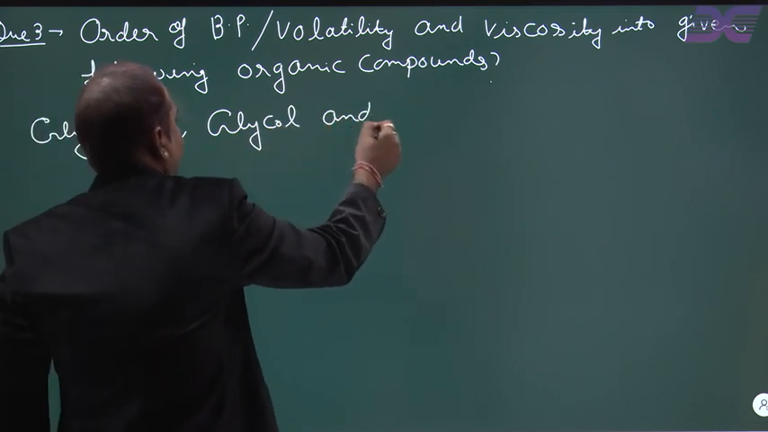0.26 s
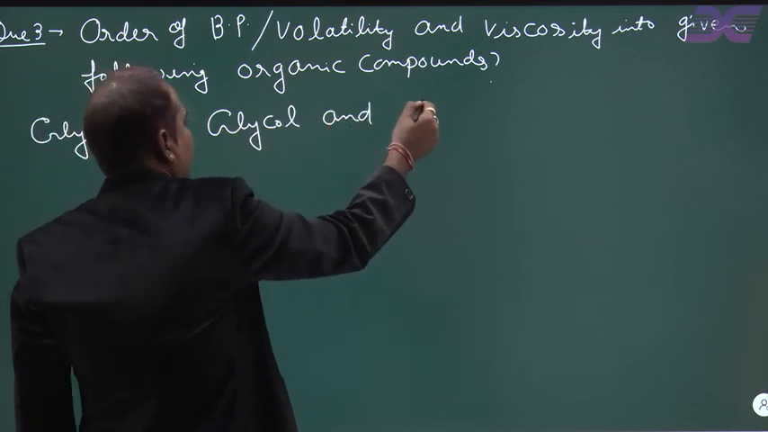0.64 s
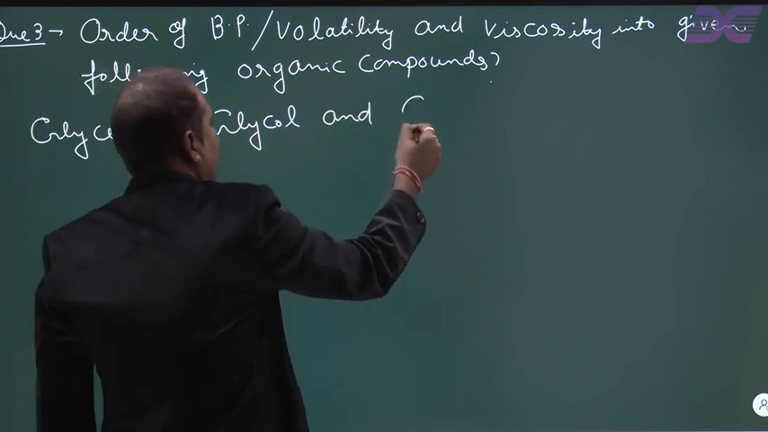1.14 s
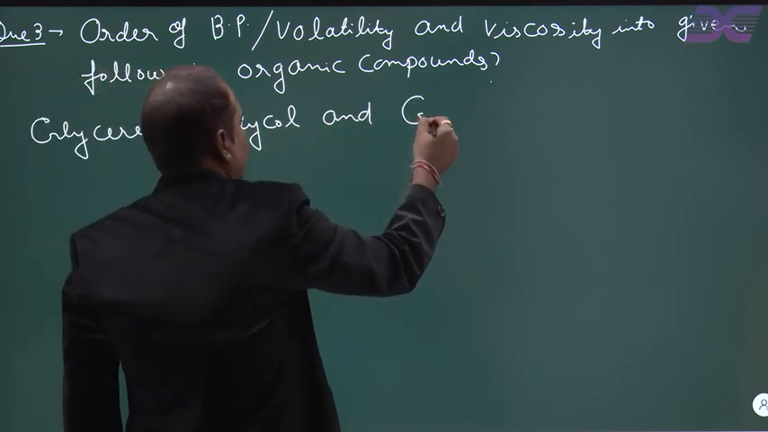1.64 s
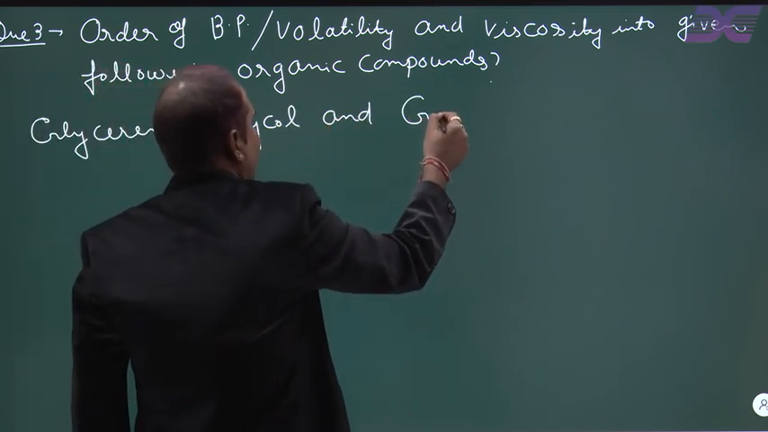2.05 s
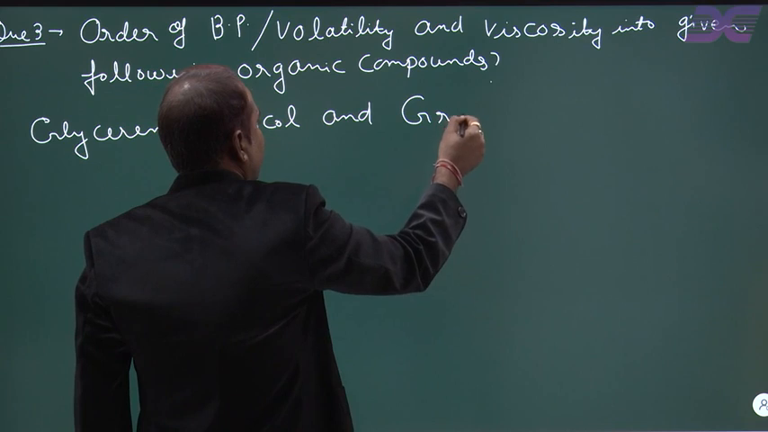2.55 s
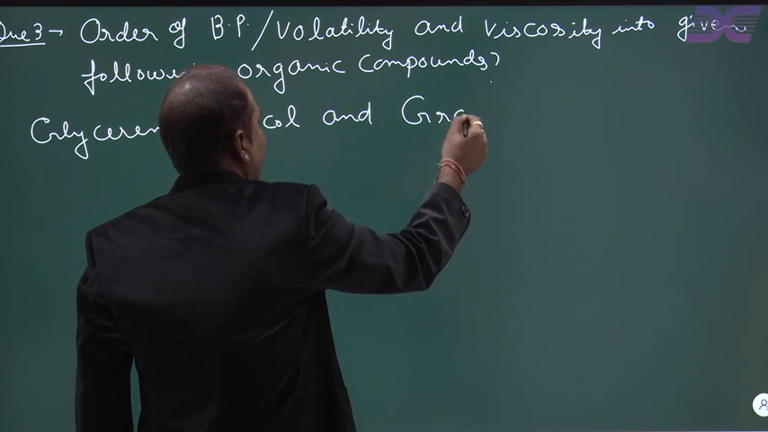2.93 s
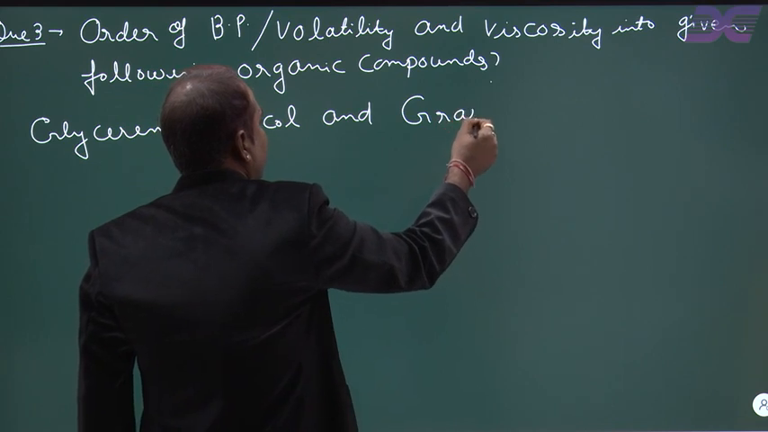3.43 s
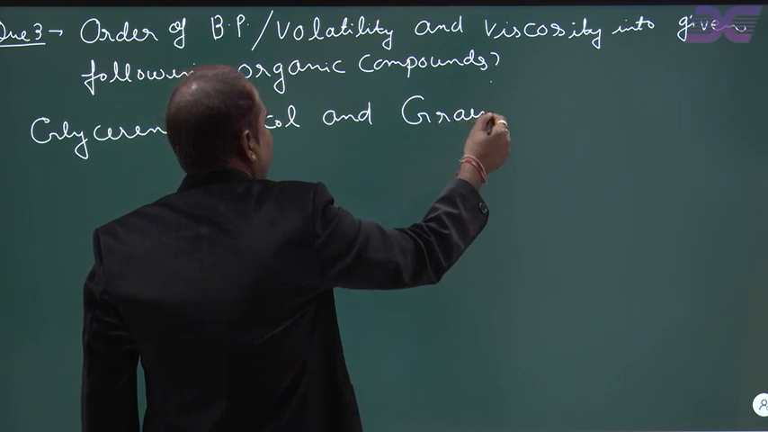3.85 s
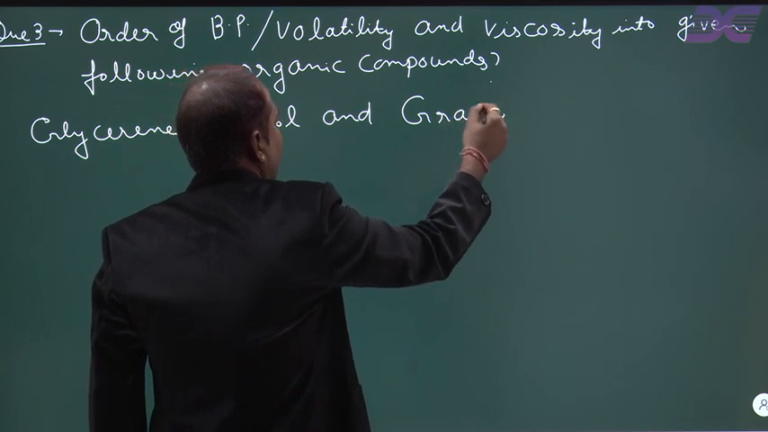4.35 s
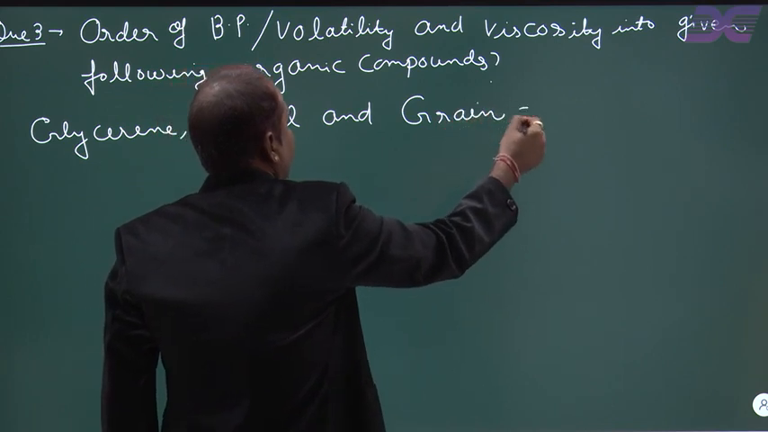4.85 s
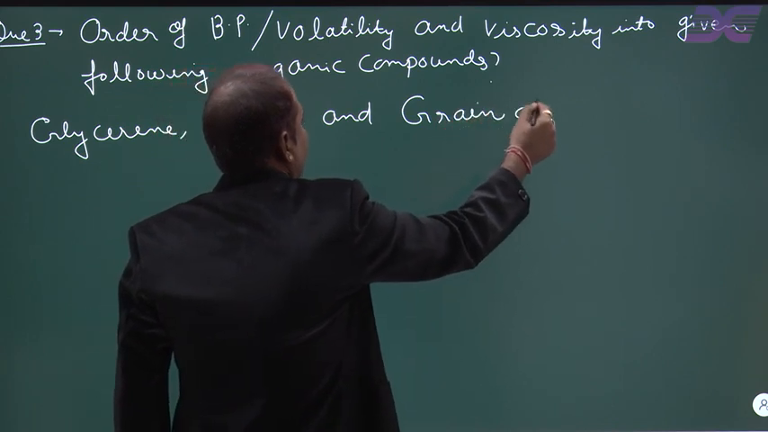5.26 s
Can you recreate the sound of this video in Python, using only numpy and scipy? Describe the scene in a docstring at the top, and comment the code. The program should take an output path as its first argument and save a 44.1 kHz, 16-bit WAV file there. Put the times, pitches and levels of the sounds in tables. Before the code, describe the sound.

Chalk taps and softly scratches across a blackboard in a quiet room, with light jacket rustle over a low hum.

```python
"""Chalk on a blackboard

Someone writes on a wall blackboard in a quiet classroom, heard through a clip-on microphone.
The chalk lands with a click that sets the board ringing, then hisses along each curve of the letters.
A jacket rustles and bumps near the microphone; under it all lie room rumble and a faint mains hum."""
import sys
import numpy as np
from scipy import signal
from scipy.fft import rfft, irfft, next_fast_len
from scipy.io import wavfile
from scipy.ndimage import uniform_filter1d, map_coordinates

SR = 44100
rng = np.random.default_rng(int(sys.argv[2]) if len(sys.argv) > 2 else 0)


def wav_record(signal):
    """Record a signal, one row per channel, as 16-bit PCM in the file named by sys.argv[1]."""
    frames = np.transpose(np.atleast_2d(signal))
    bounded = np.clip(frames, -1, 1)
    # unit amplitude maps onto the largest positive 16-bit level
    quanta = np.round(bounded * 32767).astype(np.int16)
    wavfile.write(sys.argv[1], SR, quanta)


N = 242197

# One chalk stroke per curve of a letter. Each row: time of top speed, time speeding up and time
# slowing down in seconds, then the levels of the stick's ring and its sharp edge's hiss in dB.
STROKES = [ (.047, 0.079, 0.057, -49, -58), (.165, 0.092, 0.11, -54.5, -57.5),
           (.80, 0.12, 0.29, -61.5, -66.5), (1.03, 0.22, 0.15, -64, -66), (1.17, 0.16, 0.16, -61, -61.5),
           (1.35, 0.15, 0.076, -67, -67.5), (1.50, 0.11, 0.099, -66.5, -61.5),
           (1.70, 0.17, 0.097, -62, -64.5), (1.99, .08, 0.19, -63, -62), (2.11, 0.094, 0.078, -70, -65.5),
           (2.225, 0.13, .11, -65, -59.5), (2.38, 0.1, 0.074, -65.5, -65), (2.73, 0.12, .11, -63, -63),
           (2.86, 0.16, 0.13, -63, -58), (3.12, 0.098, .09, -67, -65.5), (3.19, .08, 0.075, -66, -59.5),
           (3.27, 0.098, 0.083, -67, -73), (3.50, 0.24, 0.16, -64.5, -62), (3.69, 0.069, 0.095, -65, -65.5),
           (3.805, .06, 0.1, -63, -65), (3.99, 0.096, .1, -64.5, -63), (4.095, 0.094, 0.07, -59.5, -61.5),
           (4.76, 0.06, 0.054, -58.5, -60), (4.835, .07, 0.15, -61, -60.5), (5.04, 0.081, 0.17, -63, -58.5),
           (5.18, .13, 0.074, -57, -66), (5.27, 0.075, .1, -60.5, -62), (5.38, 0.11, 0.039, -60.5, -59)]


def amp(db):
    """Turn decibels (dB) into a number to multiply a sound by."""
    return 10 ** (np.asarray(db) / 20)


def unit(x):
    """Scale a signal to an average strength (root mean square) of 1."""
    return x / np.sqrt(np.mean(x ** 2) + 1e-20)


def along(points, hz):
    """Read between rows of frequency and value, spacing the octaves evenly."""
    freqs, values = np.transpose(points)
    return np.interp(np.log(hz + 1), np.log(freqs + 1), values)


def wobble(rate):
    """A smooth curve through `rate` random values a second."""
    return map_coordinates(rng.standard_normal(int(N * rate / SR) + 4), [np.arange(N) * rate / SR])


def coloured(x, tone):
    """Filter x to strength 1 by a tone table, whose levels say how strong each frequency is."""
    size = next_fast_len(len(x) + 8192)
    hz = np.fft.rfftfreq(size, 1 / SR)
    low_cut = 1 / (1 + (tone[0][0] / (hz + 1)) ** 8)
    high_cut = 1 / (1 + (hz / tone[-1][0]) ** 16)
    shaped = rfft(x, size) * amp(along(tone, hz)) * low_cut * high_cut
    return unit(irfft(shaped, size)[:len(x)])


def noise(tone, size):
    """Fresh noise with the given tone, at strength 1."""
    return coloured(rng.standard_normal(size), tone)


def burst(tone, shape):
    """Noise that follows a loudness shape and has the same energy as that shape."""
    return unit(noise(tone, len(shape)) * shape) * np.sqrt(np.mean(shape ** 2))


def fade(t, ring_s):
    """Die away smoothly, dropping 60 dB in ring_s seconds."""
    return np.exp(-np.log(1000) * t / ring_s)


def ringing(notes, t, scatter_db):
    """A struck object's own notes fade away, with new random strengths at each hit."""
    hz, db, ring_s = np.transpose(notes)[:, :, None]
    gain = amp(db + scatter_db * rng.standard_normal(db.shape)) * rng.choice([-1, 1], db.shape)
    waves = gain * np.sin(2 * np.pi * hz * t) * fade(t, ring_s)
    return waves.sum(axis=0) / np.sqrt(np.sum(gain ** 2) / 2)


def grains(rate, spread_db):
    """Tiny impacts of random size, about `rate` a second."""
    hit = rng.random(N) < rate / SR
    return unit(hit * rng.standard_normal(N) * amp(spread_db * rng.standard_normal(N)))


def add(track, start, sound):
    """Mix a sound into the track at `start` seconds."""
    part = track[max(round(start * SR), 0):][:len(sound)]
    part += sound[:len(part)]


def speed(fastest, rise_s, fall_s):
    """The hand speeds up from rest and slows again: a curve from 0 to 1 and back."""
    progress = np.interp(np.arange(N) / SR - fastest, [-rise_s, 0, fall_s], [0, 1, 0])
    return np.sin(np.pi / 2 * progress) ** 2


def loudness(speeds, db, power):
    """Combined loudness of several movements, each reaching its level at full speed."""
    return np.linalg.norm(amp(db)[:, None] * speeds ** power, axis=0)


def room():
    """Steady room noise, a swelling deep rumble and the hum of mains electricity."""
    # The room's tone. Each row: frequency in Hz, level in dB.
    room_tone = [(12, -6), (20, 0), (83, -3.5), (158, -4.5), (443, -15.5), (524, -16.5), (891, -20.5),
                 (1110, -23), (1790, -30), (2960, -34.5), (3220, -33.5), (4250, -35.5), (4630, -35),
                 (6840, -34), (15800, -38.5)]
    rumble = amp(-69.5 + 6.1 * wobble(7)) * noise([(25, -1), (40, 11), (70, -25)], N)
    hum = np.sqrt(2) * np.sin(2 * np.pi * 100 * np.arange(N) / SR + 0.47 * wobble(3.49))
    return amp(-51) * noise(room_tone, N) + amp(-58) * hum + rumble


def drifting(x, depth_db):
    """Narrow bands of pitch come and go as the chalk's contact point travels."""
    bands = signal.stft(x, nperseg=1024)[2]

    def patches(width):
        across_pitch = uniform_filter1d(rng.standard_normal(bands.shape), width, axis=0)
        return unit(uniform_filter1d(across_pitch, size=8, axis=1))  # smooth over time too

    drift = unit(patches(width=3) + patches(width=12))  # thin peaks on broad humps
    return signal.istft(bands * amp(depth_db * drift), nperseg=1024)[1][:N]


def chalk_strokes(speeds):
    """Chalk crumbles in thousands of tiny slips, louder and brighter the faster it moves."""
    # Three tones. Each row: frequency in Hz, level in dB.
    rasp_tone = [(2300, -1.5), (2600, 3.5), (3200, -8.5), (3900, -3), (4700, 1), (5600, -4), (7000, -9)]  # chalk on the board
    stick_tone = [(5600, -13), (6100, -5), (6550, 1), (6850, -3), (7250, -8), (7750, -1), (8000, -2),
                  (8350, 1), (8900, -5), (9500, -16)]  # the gripped stick ringing
    edge_tone = [(9300, -11), (10100, -1), (10600, 0), (11400, -1), (12300, -10), (13200, -11), (14200, -7),
                 (15100, -12), (16500, -13)]  # its sharp edge ringing
    *_, stick_db, edge_db = np.transpose(STROKES)
    rasp_db = -69 + 0.42 * (stick_db - stick_db.mean())  # louder strokes also rasp more
    slips = drifting(grains(rate=7000, spread_db=1.5), depth_db=3.2)
    grip_db = 0.97 * wobble(70)  # the tip catches and frees
    rasp = loudness(speeds, rasp_db, power=0.51) * coloured(slips, rasp_tone)
    stick = loudness(speeds, stick_db, power=0.93) * coloured(slips, stick_tone)
    edge = loudness(speeds, edge_db, power=1.2) * coloured(slips, edge_tone)
    return amp(grip_db) * (rasp + stick + edge)


def jacket(speeds):
    """The moving arm rubs the cloth, which once brushes the microphone with a crackle."""
    # Wide arm swings. Each row: time of top speed and half the length in seconds, level in dB.
    swings = [(0.03, .13, -43), (0.181, 0.042, -46.5), (.4, .2, -48), (.615, 0.076, -54), (1, .09, -45.5),
              (1.12, 0.15, -49), (3.86, .25, -53), (5.147, 0.15, -54)]
    # The brush against the microphone. Each row: time in seconds, level in dB.
    brush = [(0.32, -63.5), (0.386, -58.5), (0.426, -45.5), (0.466, -52), (0.472, -47.5), (0.54, -74)]
    # Two tones. Each row: frequency in Hz, level in dB.
    rub_tone = [(29, -22), (50, -22), (70, -5), (97, -3), (183, 2.5), (386, -11), (470, -8), (829, -26.5),
                (890, -18), (3500, -39.5), (4550, -70), (7700, -120)]  # the sleeve rubbing
    crackle_tone = [(500, 18.5), (1000, -1), (1800, 2.5), (2600, 5), (4000, -1.5), (6500, 2), (8500, 0),
                    (11000, -6), (16000, -7)]  # cloth on the microphone
    swing_speeds = np.array([speed(fastest, half, half) for fastest, half, _ in swings])
    swinging = loudness(swing_speeds, [db for *_, db in swings], power=0.65)
    writing = amp(-58.5) * speeds.max(axis=0)
    rub = np.hypot(swinging, writing) * noise(rub_tone, N)
    brush_db = np.interp(np.arange(N) / SR, *np.transpose(brush), left=-120, right=-120)
    fibres = grains(rate=4000, spread_db=3.5)
    return rub + amp(brush_db) * coloured(fibres, crackle_tone)


def ticks_and_bumps():
    """Small ticks and bumps, two of them from the chalk bouncing on the board."""
    # Tiny dry ticks, and a sharp click as the chalk bounces after its hardest landing.
    # Each row: start in seconds, level in dB.
    ticks = [(0.411, -40), (0.4316, -42), (0.4713, -35), (0.4968, -37.5), (4.296, -22), (4.389, -36.5),
             (4.3925, -43)]
    # Soft body bumps, and a light knock as the chalk rebounds on the board.
    # Each row: start in seconds, low thump level in dB, knock level in dB.
    bumps = [(.18, -40, -60), (0.332, -41, -63), (0.422, -33.5, -45), (.477, -35.5, -52), (.494, -44, -64),
             (.746, -38, -40), (0.8166, -23.5, -36), (.853, -34, -42), (1.023, -43, -45), (1.128, -34, -48),
             (1.551, -36.5, -63), (2.55, -47, -42.5)]
    # A thump's low notes. Each row: frequency in Hz, level in dB, ring time in seconds.
    thump_notes = [(75.5, -0.5, 0.16), (134, -0.5, 0.097), (193, 1.5, 0.09), (271, -5, 0.1),
                   (392, -7.5, 0.076), (700, -22, 0.023)]
    # Tones of a tick and a knock. Each row: frequency in Hz, level in dB.
    tick_tone = [(1200, 10), (3000, -9), (6000, 6), (10000, -1), (16000, -8)]
    knock_tone = [(200, -7), (400, 2), (700, -5), (1100, -18), (2500, -35), (4500, -25)]
    out, t = np.zeros(N), np.arange(SR // 3) / SR
    for start, db in ticks:
        add(out, start, amp(db) * burst(tick_tone, fade(t, 0.0024)))
    for start, thump_db, knock_db in bumps:
        thump = amp(thump_db) * ringing(thump_notes, t, scatter_db=2.5) * (1 - fade(t, 0.02))
        knock = amp(knock_db) * burst(knock_tone, (1 - fade(t, 0.0044)) * fade(t, 0.04))
        add(out, start, thump + knock)
    return out


def dense_ring(tone):
    """One second of many notes blurred together, each band of pitch fading at its own speed."""
    # How long board and room ring. Each row: frequency in Hz, ring time in seconds.
    ring_times = [(120, 0.89), (300, 1), (600, 0.55), (1100, 0.36), (2000, 0.28), (3000, 0.26),
                  (6000, 0.074)]
    hz, t, bands = signal.stft(noise(tone, SR), SR, nperseg=256)
    fading = bands * fade(t, along(ring_times, hz)[:, None])
    return signal.istft(fading, SR, nperseg=256)[1][:SR]


def chalk_taps():
    """Each landing clicks in the chalk stick, rings the board's panel and thuds in its frame."""
    # Each row: start in seconds, then levels in dB of the click, ring, thud, snap, clack and rap.
    landings = [(0.6735, -36.5, -36.5, -47.5, -73, -45, -58), (1.9164, -31, -29.5, -45.5, -59, -60, -34),
                (2.626, -31, -32.5, -45, -59, -35.5, -51), (4.281, -16, -21, -31, -29, -21.5, -23),
                (4.6882, -25.5, -30, -41.5, -29, -34.5, -65)]
    # The panel's own notes. Each row: frequency in Hz, level in dB, ring time in seconds.
    panel_notes = [(413, -13, 0.75), (483, 3.5, 0.47), (500, 1.5, 0.51), (612, 3.5, 0.3), (690, -2, 0.27),
                   (821, -0.5, 0.4), (960, 2.5, 0.23), (1037, -10, 0.31), (1087, -5, 0.27),
                   (1134, -11, 0.45), (1297, 1.5, 0.16), (1335, -12, 0.11), (1340, -13.5, 0.3),
                   (1445, -34, 0.13), (1620, -22, 0.24), (1806, -14, 0.27)]
    # Six tones. Each row: frequency in Hz, level in dB.
    click_tone = [(2800, -17), (3300, 3.5), (3800, -4), (4500, -2.5), (5200, -1.5), (5600, -6), (6150, 5.5),
                  (7000, -1), (7900, -1), (8800, -2), (9600, -11), (11500, -13), (13500, -14), (16000, -18)]  # the chalk stick
    clack_tone = [(2200, -12), (2550, 7.5), (2800, 7.5), (3300, -23)]  # its lowest note as it bends
    snap_tone = [(9200, -18), (9800, 3), (10400, 1), (11200, -4)]  # its crushed tip
    rap_tone = [(1350, 9), (1550, -3), (1780, -6), (1950, -28), (2300, -1)]  # the board's hard face
    panel_tone = [(300, -28), (430, -6.5), (500, 3), (750, -3.5), (1050, 3), (1350, -8), (1700, -16.5),
                  (2200, -18.5), (2600, -17.5), (3500, -22.5), (6000, -14.5)]  # the panel's blurred ring
    thud_tone = [(30, 6), (60, -8), (100, -4.5), (150, 0), (250, -3.5), (380, -5), (520, -18)]  # the frame
    out, t = np.zeros(N), np.arange(SR) / SR
    onset = 1 - fade(t, 0.004)
    # A dry crack, then its scatter off the board and the writer.
    crack = onset * (fade(t, 0.015) + amp(-10) * fade(t, 0.079))
    for start, click_db, ring_db, thud_db, snap_db, clack_db, rap_db in landings:
        stick = amp(click_db) * burst(click_tone, crack) + amp(clack_db) * burst(clack_tone, crack)
        tip = amp(snap_db) * burst(snap_tone, crack)
        rap = amp(rap_db) * burst(rap_tone, onset * (fade(t, 0.028) + amp(-15) * fade(t, 0.3)))
        knock = amp(5) * burst(panel_tone, onset * fade(t, 0.025))
        ring = amp(-9) * ringing(panel_notes, t, scatter_db=-2) + amp(-6) * dense_ring(panel_tone)
        panel = amp(ring_db) * (knock + onset * ring)
        frame = amp(thud_db) * onset * dense_ring(thud_tone)
        add(out, start, stick + tip + rap + panel + frame)
        echo = amp(ring_db - 18.5) * dense_ring(panel_tone) * (1 - fade(t, 0.03)) * fade(t, 0.33)
        add(out, start + 0.042, echo)  # the far wall returns the panel's ring
    return out


def chalk_chirps():
    """The tip catches briefly and sets the stick's lowest note ringing."""
    # Each row: start in seconds, level in dB.
    catches = [(.862, -52.5), (.882, -58), (2.322, -59)]
    out, t = np.zeros(N), np.arange(SR // 4) / SR
    shape = (1 - fade(t, 0.015)) * fade(t, 0.059)
    for start, db in catches:
        add(out, start, amp(db) * burst([(2350, -9), (2560, 0), (2800, -11)], shape))
    return out


def scene():
    """Mix all sounds into one channel; the hand's speed drives both chalk and sleeve."""
    speeds = np.array([speed(fastest, rise_s, fall_s) for fastest, rise_s, fall_s, *_ in STROKES])
    chalk = chalk_strokes(speeds) + chalk_chirps() + chalk_taps()
    return (chalk + jacket(speeds) + ticks_and_bumps() + room())[None]


def record(dry):
    """Cut off the very highest treble."""
    top_hz = 15830
    size = next_fast_len(N + SR // 2)
    kept = np.fft.rfftfreq(size, 1 / SR) < top_hz
    return irfft(rfft(dry, size) * kept, size)[:, :N]


dry = scene()
out = record(dry)
wav_record(out)
```